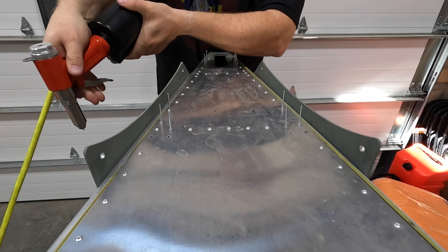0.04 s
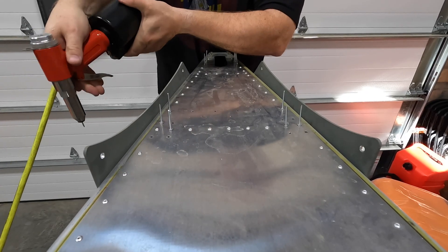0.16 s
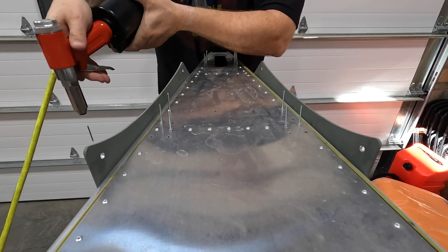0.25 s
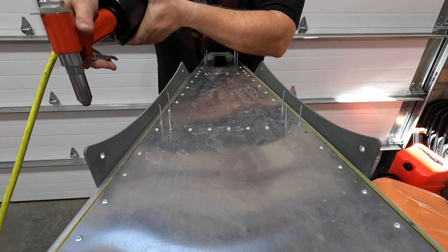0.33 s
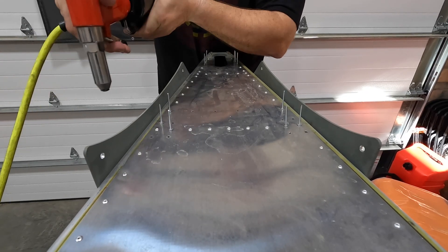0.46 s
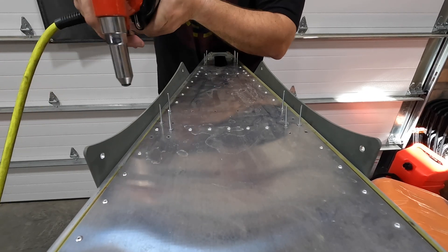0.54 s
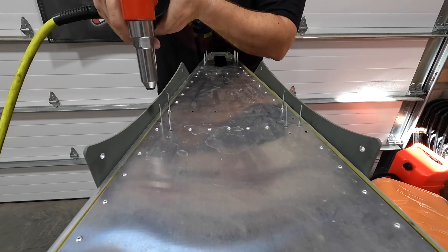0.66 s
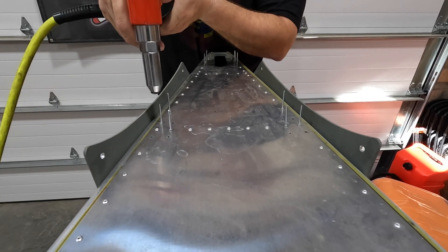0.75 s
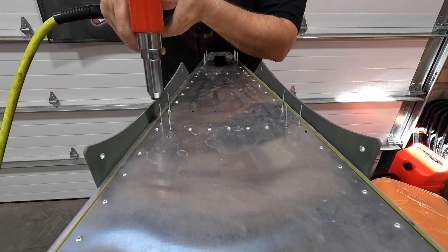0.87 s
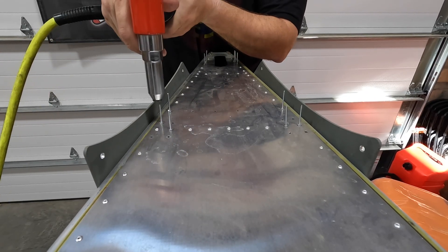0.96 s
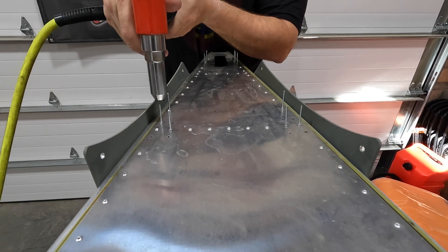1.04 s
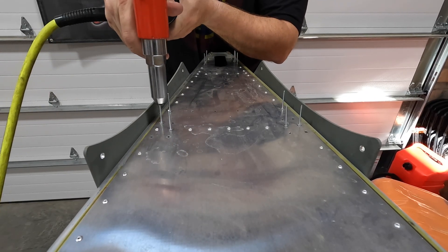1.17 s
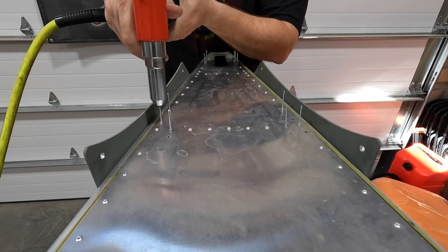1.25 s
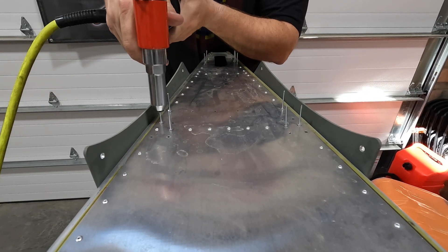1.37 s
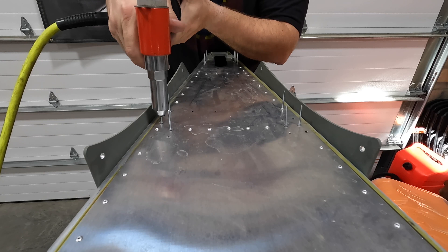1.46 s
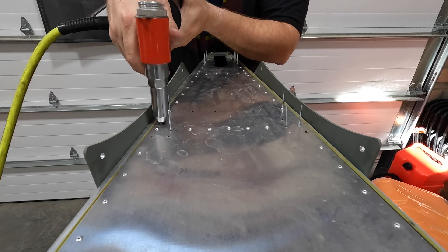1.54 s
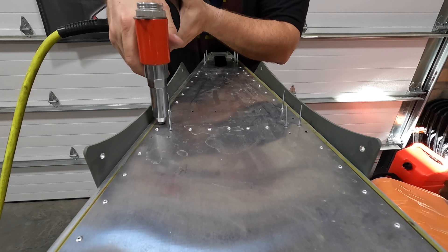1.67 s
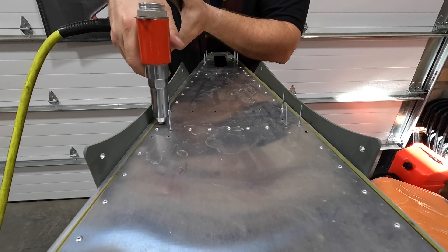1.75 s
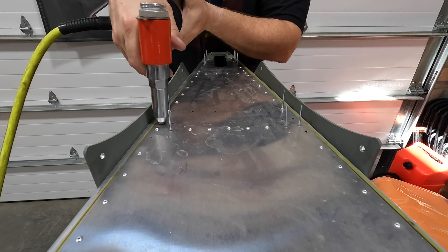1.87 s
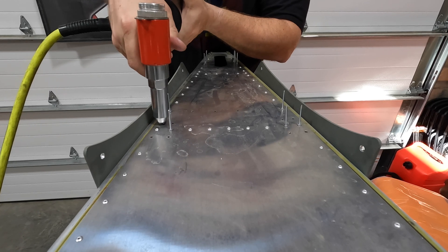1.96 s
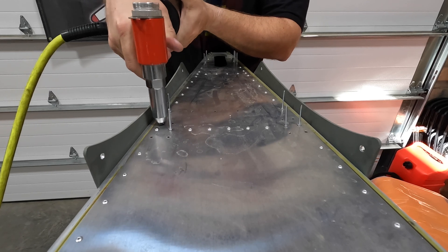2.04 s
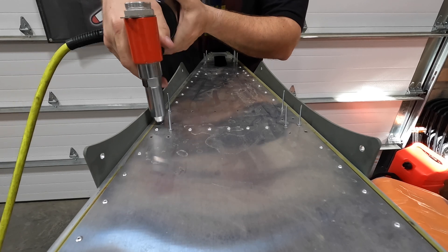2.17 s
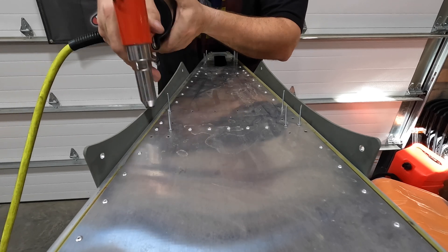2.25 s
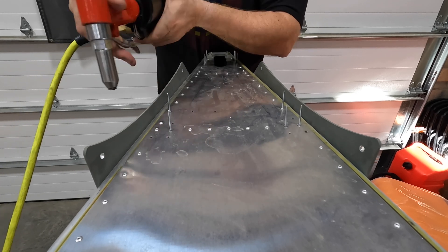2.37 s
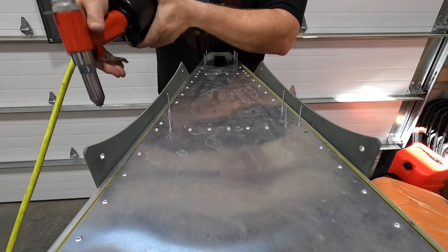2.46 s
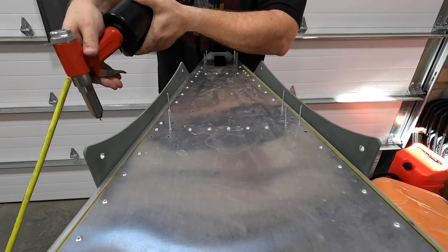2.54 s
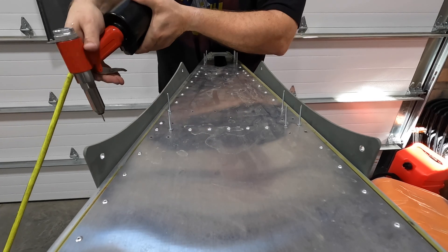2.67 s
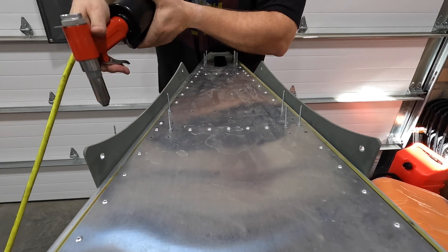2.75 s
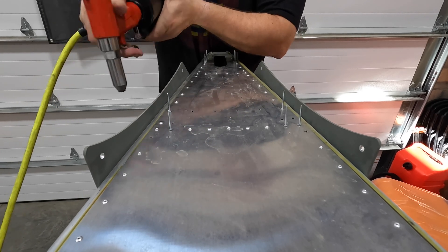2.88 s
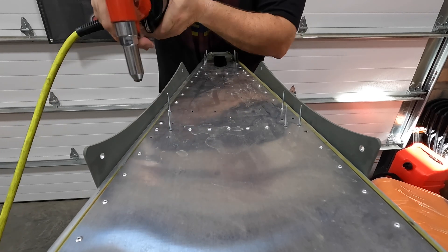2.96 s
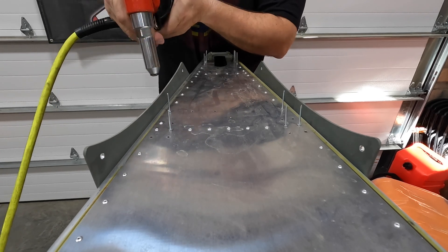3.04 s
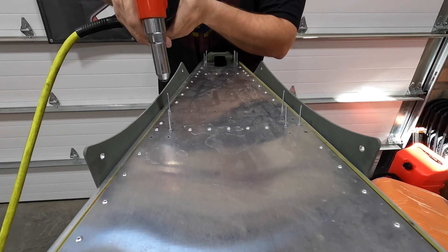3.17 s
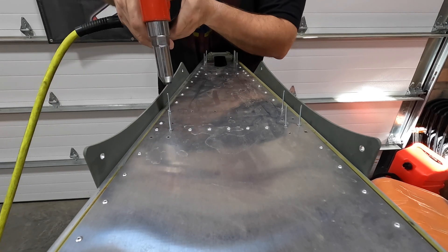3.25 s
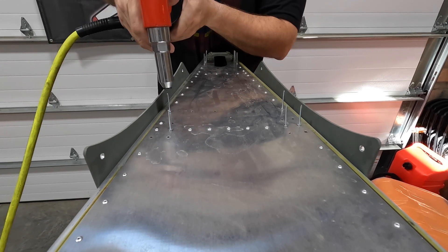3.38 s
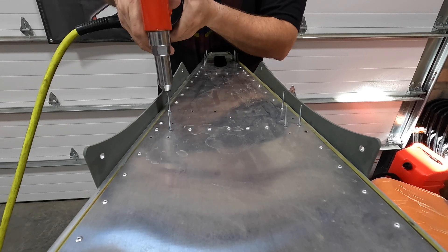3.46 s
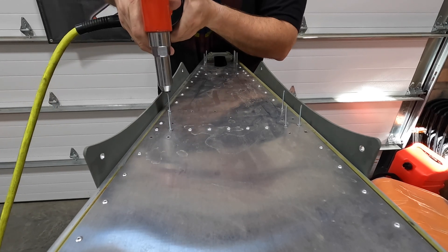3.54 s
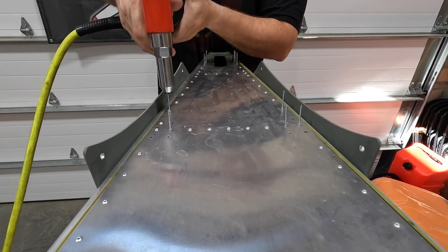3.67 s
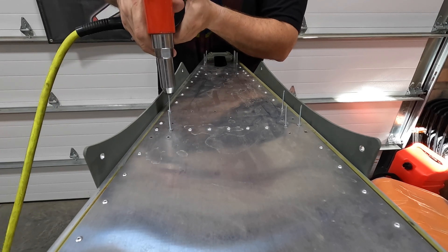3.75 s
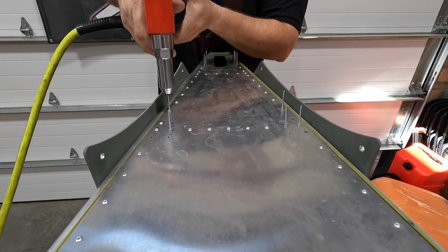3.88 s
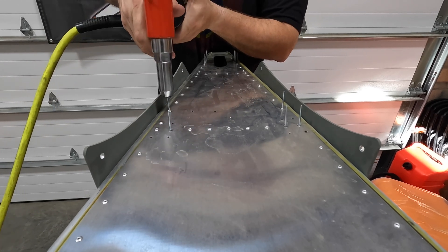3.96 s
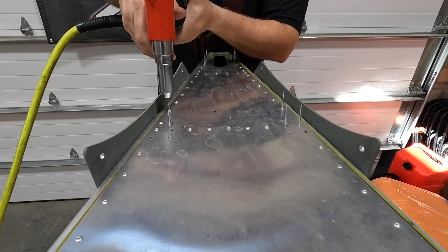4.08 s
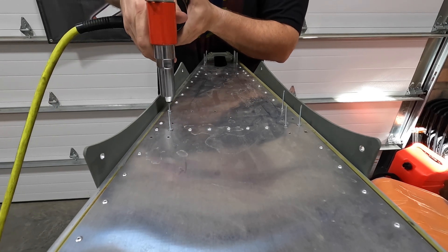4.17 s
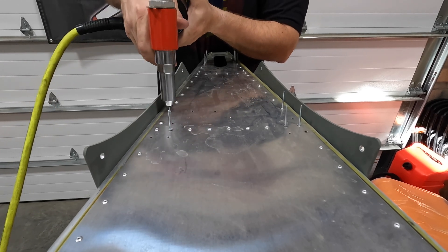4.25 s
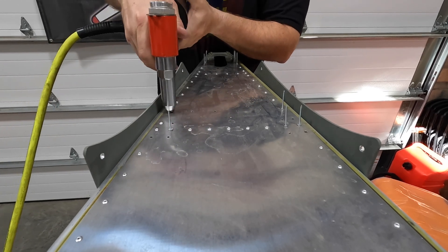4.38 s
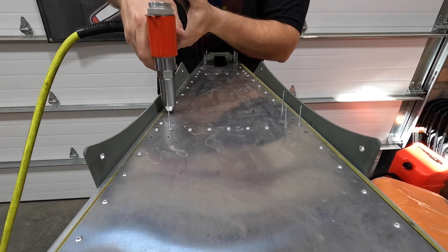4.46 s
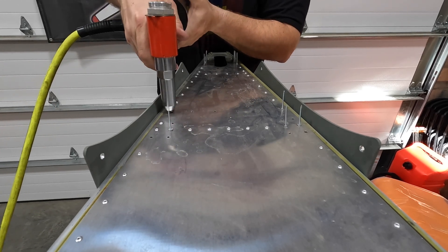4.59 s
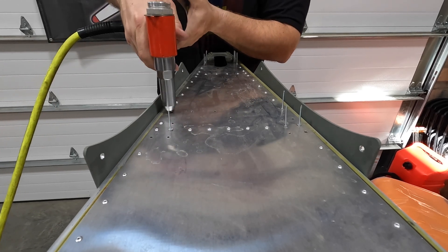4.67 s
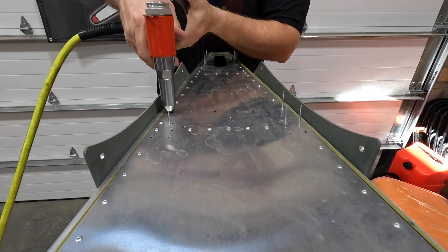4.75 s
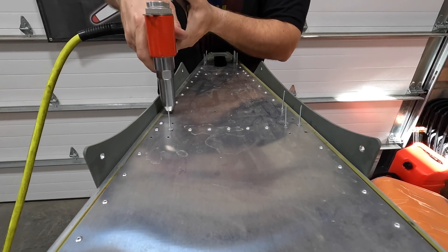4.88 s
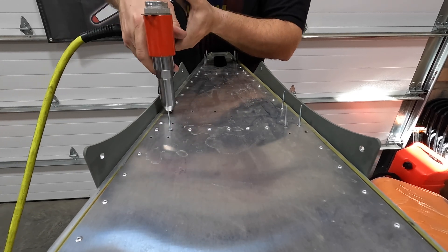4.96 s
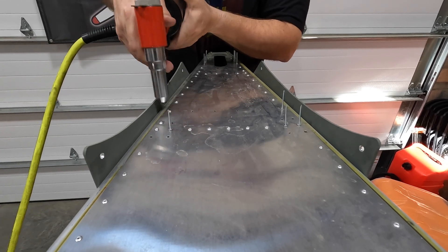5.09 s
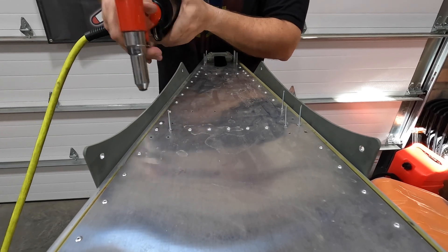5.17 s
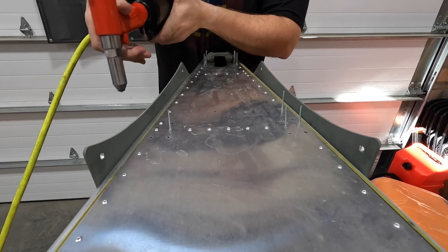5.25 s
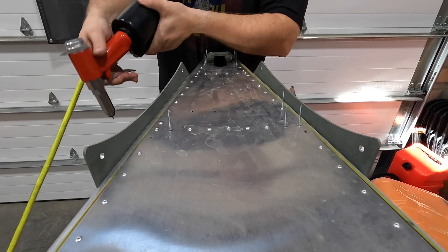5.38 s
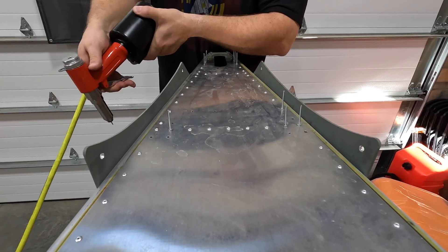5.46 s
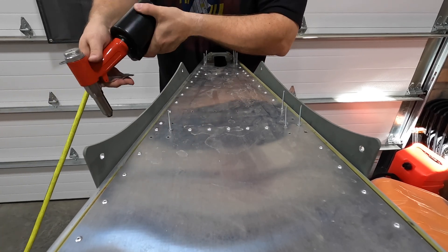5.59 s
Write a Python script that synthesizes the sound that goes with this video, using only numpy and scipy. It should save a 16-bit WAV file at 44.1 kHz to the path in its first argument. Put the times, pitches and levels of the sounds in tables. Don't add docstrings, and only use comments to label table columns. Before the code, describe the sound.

Over a constant throbbing compressor drone at the back of a workshop, a close air rivet gun clicks onto sheet metal, rushes with air, cracks sharply and hisses out. Light handling ticks follow, then a second tap, crack and hiss. The hollow panel thumps directly into the stereo microphones, and the drone dips after each blast.

```python
import sys
import numpy as np
from scipy import signal
from scipy.fft import rfft, irfft
from scipy.io import wavfile
from scipy.ndimage import uniform_filter1d, map_coordinates

SR = 44100
rng = np.random.default_rng(int(sys.argv[2]) if len(sys.argv) > 2 else 0)


def materialize(psi):
    bounded = np.clip(np.atleast_2d(psi).T, -1, 1)
    quanta = np.round(bounded * 32767).astype(np.int16)
    wavfile.write(sys.argv[1], SR, quanta)


def amplitude_ratio(level_db):
    exponent = np.asarray(level_db, float) / 20
    return 10 ** exponent


N = 247842
T = np.arange(N) / SR
HZ = np.fft.rfftfreq(N, 1 / SR)

CRANK_HZ = 28.256
# multiple of the crank rate, level/dB
CRANK_TONES = [(1, -49), (2, -33), (3, -58), (4, -36), (5, -43), (6, -42), (7, -52), (8, -42), (9, -46),
               (10, -42), (11, -44), (13, -42), (14, -34), (15, -44), (16, -45), (17, -49), (18, -45),
               (19, -51), (20, -51), (44, -48), (45, -50), (46, -44), (47, -47), (48, -43), (49, -41),
               (50, -46), (51, -51), (52, -49)]


def unit(x):
    return x / np.sqrt(np.mean(x ** 2))


def steady(x, span_s):
    return x / np.sqrt(uniform_filter1d(x ** 2, int(span_s * SR)) + 1e-12)


def shape(points):
    hz, db = np.transpose(points)
    return amplitude_ratio(np.interp(np.log(HZ + 1), np.log(hz), db))


def bumps(peaks):
    return amplitude_ratio(sum(db / (1 + (2 * (HZ - hz) / width) ** 2) for hz, width, db in peaks))


def above(hz):
    return 1 / np.sqrt(1 + (hz / (HZ + 1)) ** 8)


def below(hz):
    return 1 / np.sqrt(1 + (HZ / hz) ** 8)


def noise(gain):
    return irfft(rfft(rng.standard_normal(N)) * gain, N)


def walk(rate):
    k = int(SR / rate)
    return unit(uniform_filter1d(uniform_filter1d(rng.standard_normal(N), k), k))


def ring(x, hz, t60):
    p = np.exp(2j * np.pi * hz / SR - np.log(1000) / (t60 * SR))
    return signal.lfilter([0, p.imag], [1, -2 * p.real, abs(p) ** 2], x)


def body(x, modes):
    return sum((-1) ** k * amplitude_ratio(db) * ring(x, hz, t60) for k, (hz, db, t60) in enumerate(modes))


def hold_fall(since, hold_s, fall_db_per_s):
    return -fall_db_per_s * np.maximum(since - hold_s, 0)


def mix(levels_db):
    return np.sqrt(sum(amplitude_ratio(db) ** 2 for db in levels_db))


def tail(t60):
    t = np.arange(int(t60 * SR)) / SR
    h = rng.standard_normal(len(t)) * np.exp(-np.log(1000) * t / t60)
    return h / np.sqrt(np.sum(h ** 2))


def gain_control():
    # t/s, dip/dB, treble the shop gives back/dB, which lingers/s
    ducks = [
        (-.5, 10.5, 0, .2),
        (1.71, 2.2, 0, .2),
        (2.1, 8.5, 19, 0.27),
        (4.49, 3, -4, 0.22),
        (4.94, 10.5, 10.5, 0.49),
    ]
    attack_s, recover_s = 0.16, 1.233
    gain_db = 1.18
    treble_db = -0.4 + 1.5 * T
    for s, dip_db, bright_db, linger_s in ducks:
        since = np.maximum(T - s, 0)
        grab = 1 - np.exp(-since / attack_s)
        gain_db = gain_db - dip_db * grab * np.exp(-(since / recover_s) ** 2)
        treble_db = treble_db + bright_db * grab * np.exp(-(since / linger_s) ** 2)
    return gain_db, treble_db


def faint_tones():
    # f/Hz, width/Hz, lift/dB
    pipes = [(1120, 200, 11.5), (1390, 71, 8), (1760, 290, 9), (2580, 67, 10.5)]
    base_db, scatter_db, heard_db = -64, 3, -60.5
    ks = np.setdiff1d(np.arange(26, 95), np.transpose(CRANK_TONES)[0])
    lift_db = sum(db / (1 + (2 * (ks * CRANK_HZ - hz) / width) ** 2) for hz, width, db in pipes)
    levels_db = base_db + lift_db + scatter_db * rng.standard_normal(len(ks))
    return [(k, db) for k, db in zip(ks, levels_db) if db > heard_db]


def compressor():
    # f/Hz, level/dB per Hz
    wash_points = [(15, -17), (28, 0.5), (48, 10), (70, -38), (500, -18), (750, -11), (1150, -10),
                   (1400, -10.5), (1650, -12), (2550, -18.5), (2850, -22.5), (4300, -21.5), (7000, -38),
                   (12100, -50.5), (15500, -71)]
    # f/Hz, width/Hz, lift/dB
    housing = [(2620, 230, 3), (3500, 800, 0), (4700, 140, 6.5), (5540, 1540, -5), (6610, 1100, 8)]
    wash_db, puff_depth_db = -33, 0.5
    gain_db, treble_db = gain_control()
    turn = 2 * np.pi * CRANK_HZ * T
    sway = [walk(13.0) for _ in range(4)]
    tones = 0
    for k, db in CRANK_TONES + faint_tones():
        waver = 0.00075 * k * sway[int(k) % 4]
        spread_rad = 1.45 if k < 30 else 0.6
        phase = spread_rad * k * k + 0.5 * rng.standard_normal()
        tones = tones + np.sqrt(2) * amplitude_ratio(db + 1.6 * waver) * np.sin(k * turn + waver + phase)
    colour = shape(wash_points) * bumps(housing)
    low = noise(colour * below(1240.0))
    high = noise(colour * above(1150.0))
    puff_db = puff_depth_db * (np.cos(turn) + np.cos(2 * turn) + np.cos(5 * turn))
    high = high * amplitude_ratio(treble_db + puff_db + 0.41 * walk(14))
    wash = amplitude_ratio(wash_db) * unit(low + high)
    return amplitude_ratio(gain_db) * (tones + wash)


def panel():
    # f/Hz, level/dB, t60/s
    frame = [(65, 3, 0.11), (77.2, 1, 0.38), (96.6, -2, 0.24), (115.6, 9.5, 0.063)]
    belly = [(131.5, -2, 0.2), (137.8, -6.5, 0.23), (152.2, -5, 0.32), (169.9, -1.5, 0.32),
             (194.3, -7, 0.13), (220, -3.5, 0.21)]
    skin = [(237, 3, 0.11), (279.4, 3.5, 0.096), (309.6, 5, 0.13), (330, 3, 0.1), (429, -2, 0.1),
            (509, 0.5, 0.077), (599, -4.5, 0.11), (684, -9.5, 0.1), (795, -7.5, 0.078), (1070, -1, 0.023)]
    # t/s, lasts/s, frame/dB, belly/dB, skin/dB
    jolts = [(0, 0.13, -37.5, -34, -45), (.28, 0.041, -36, -36.5, -52), (1.721, 0.02, -20, -17.5, -31),
             (1.806, .005, -22, -36, -50), (1.87, .005, -34, -29, -47), (2.105, 0.016, -14.5, -15.5, -21.5),
             (2.19, 0.02, -33, -16, -19.5), (2.27, 0.07, -24.5, -22, -29), (2.428, .02, -28, -25.5, -51),
             (2.5, 0.11, -33.5, -32, -54), (2.78, 0.21, -36, -44, -64), (3.877, 0.017, -29.5, -39, -47),
             (4.314, 0.018, -41, -55, -36), (4.499, 0.0061, -21, -18.5, -36),
             (4.528, 0.0067, -28, -28, -28), (4.585, .03, -23.5, -26, -45), (4.937, .008, -19, -19, -28),
             (4.953, 0.025, -17.5, -12.5, -20), (5.02, 0.012, -22, -23, -27), (5.05, .005, -36, -18, -33),
             (5.11, 0.041, -26.5, -25, -33), (5.221, .01, -25.5, -39, -39), (5.363, 0.017, -29.5, -44, -55),
             (5.55, 0.023, -28, -36, -54)]
    fall_db_per_s = [147, 148, 243]
    hands_db = [-38.5, -47, -53.5]
    rise_db_per_s = 898
    after_db, after_db_per_s = -13.5, 33
    push = rng.standard_normal(N) * amplitude_ratio(4.3 * walk(48))
    step = T[::32]
    out = 0
    for k, modes in enumerate((frame, belly, skin)):
        levels_db = [hands_db[k]]
        for s, lasts, *db in jolts:
            since = step - s
            rise_db = db[k] + rise_db_per_s * np.minimum(since, 0)
            levels_db.append(rise_db + hold_fall(since, lasts, fall_db_per_s[k]))
            levels_db.append(rise_db + after_db + hold_fall(since, lasts, after_db_per_s))
        out = out + np.interp(T, step, mix(levels_db)) * steady(body(push, modes), 0.044)
    return out


def air():
    # f/Hz, level/dB per Hz
    jet_points = [(410, -28), (700, -1.5), (818, -3), (1240, 5.5), (1850, 2.5), (2430, 4.5), (3230, -2.5),
                  (6680, -20), (11200, -15.5), (14200, -20), (15500, -32)]
    # f/Hz, width/Hz, lift/dB
    ports = [(5010, 130, 6), (5800, 1460, 14), (6430, 1400, 6.5), (7740, 1500, 11), (8540, 600, 2.5),
             (10350, 1400, 7), (12000, 1100, 2.5)]
    # f/Hz, width/Hz, lift/dB
    whistle_peaks = [(10400, 1200, 11), (12000, 1800, 15)]
    # t/s, level/dB, low rush/dB, thin leak/dB, detour off the sheet/ms
    intakes = [
        (2.092, -3, 0.5, 0.5, 0.412),
        (4.932, -1.3, -1, -2.5, .455),
    ]
    exhausts = [
        (-.232, -13, 12.5, 5.5, .42),
        (2.254, 0.5, 1.5, -1, .425),
        (5.093, 0.9, -1.5, -0.3, 0.46),
    ]
    # holds/s, falls/dB per s, hiss/dB, rush/dB, leak/dB
    intake_stages = [
        (.007, 400, -37.5, -24, -76),
        (0.084, 450, -28.5, -26, -31),
    ]
    exhaust_stages = [
        (.01, 125, -50, -50, -39),
        (0.12, 124, -29.5, -33, -39),
        (0.38, 150, -47, -46, -52.5),
        (0.43, 10, -52, -43, -62.5),
    ]
    open_s, shut_s = 0.006, 0.0034
    whistle_db, whistle_from_s, whistle_rise_s = -50.5, 0.34, 0.091
    tipped_ms, tipping_s = 0.4, 0.35
    sheet_echo = 0.55

    colour = shape(jet_points) * bumps(ports) * below(12800.0)
    rush = unit(noise(colour * below(4000.0))) * amplitude_ratio(0.95 * walk(39))
    hiss = unit(noise(colour * above(4100.0) * below(8800.0))) * amplitude_ratio(1.1 * walk(35))
    leak = unit(noise(colour * above(8800.0))) * amplitude_ratio(1.1 * walk(30))
    whistle_colour = bumps(whistle_peaks) * above(8700.0) * below(13000.0)
    whistle = unit(noise(whistle_colour)) * amplitude_ratio(1.5 * walk(20))

    out = np.zeros(N)
    bursts = [(r, 0.101, intake_stages) for r in intakes]
    bursts += [(r, 0.572, exhaust_stages) for r in exhausts]
    for (opens, db, rush_db, leak_db, detour_ms), lasts, stages in bursts:
        on = (T >= opens) & (T < opens + lasts + shut_s)
        since = T[on] - opens
        valve = np.clip(np.minimum(since / open_s, (lasts - since) / shut_s + 1), 0, 1) ** 2
        falls_db = [hold_fall(since, *stage[:2]) for stage in stages]
        hiss_gain, rush_gain, leak_gain = (
            mix(stage[k] + fall_db for stage, fall_db in zip(stages, falls_db)) for k in (2, 3, 4))
        jet = hiss_gain * hiss[on] + amplitude_ratio(leak_db) * leak_gain * leak[on]
        late_ms = detour_ms + (tipped_ms - detour_ms) * np.clip(since / tipping_s, 0, 1)
        heard_at = np.maximum(np.arange(len(jet)) - late_ms * SR / 1000, 0)
        echo = map_coordinates(jet, [heard_at], order=3)
        thinning = np.clip((since - whistle_from_s) / whistle_rise_s, 0, 1)
        thin = amplitude_ratio(whistle_db + leak_db) * thinning * whistle[on]
        low = amplitude_ratio(rush_db) * rush_gain * rush[on]
        out[on] += valve * amplitude_ratio(db) * (jet + sheet_echo * echo + low + thin)
    return out


def taps():
    # t/s, crack/dB, body ring/dB, ping f/Hz, ping/dB
    contacts = [(.3406, -43.5, -48, 3870, -38), (0.505, -35, -48, 12000, -37),
                (1.334, -24, -34, 704, -31.5), (1.361, -27, -39, 2500, -36), (1.347, -44, -50, 11800, -39),
                (1.7035, -23, -32, 6640, -25), (1.7052, -31, -31, 3300, -24), (1.7097, -26, -36, 6500, -25),
                (1.7128, -24, -22, 5330, -23), (1.7205, -30, -25, 750, -18), (1.723, -45, -40, 10500, -47),
                (2.0966, -22, -20, 3600, -35), (2.183, -11, -12.5, 1243, -7.5),
                (2.828, -24, -33, 2320, -31), (4.4846, -17, -14, 2520, -25), (4.491, -21, -28, 1760, -18),
                (4.5015, -34, -25, 1020, -25), (4.508, -36, -38, 755, -20), (4.935, -24, -42, 6700, -21),
                (4.941, -24, -23, 3180, -19), (5.024, -8, -9.5, 5300, -10)]
    snaps = [
        (2.1832, -5, -19, 4880, -30),
        (5.0233, -6.5, -15, 2250, -29),
    ]
    # f/Hz, level/dB, t60/s
    ring_modes = [(958, -8.5, 0.092), (1065, -13.5, 0.22), (1350, 3.5, 0.018), (2160, -7, 0.066),
                  (2500, -8, 0.025)]
    tap_hz, snap_hz = 4530, 9050
    crack_s, grind_s, ping_cycles = 0.0005, 0.0073, 50
    out, blows = np.zeros(N), np.zeros(N)
    t = np.arange(int(0.1 * SR)) / SR
    hits = [(*r, tap_hz * (r[3] / tap_hz) ** 0.14) for r in contacts]
    hits += [(*r, snap_hz) for r in snaps]
    for s, crack_db, body_db, ping_hz, ping_db, crack_hz in hits:
        i = int(s * SR)
        grit = rng.standard_normal(len(t))
        band = signal.butter(2, [0.4 * crack_hz, 1.3 * crack_hz], "band", fs=SR, output="sos")
        crack = signal.sosfilt(band, grit * (np.exp(-t / crack_s) + 0.2 * np.exp(-t / grind_s)))
        ping = np.sin(2 * np.pi * ping_hz * t) * np.exp(-np.log(1000) * t * ping_hz / ping_cycles)
        out[i:i + len(t)] += amplitude_ratio(crack_db) * crack / abs(crack).max() + amplitude_ratio(ping_db) * ping
        blows[i] = amplitude_ratio(body_db)
    dull = signal.butter(4, 13500, fs=SR, output="sos")
    return signal.sosfilt(dull, out + body(blows, ring_modes))


def two_ports(mid, gun, boom):
    # f/Hz, level/dB
    side_points = [(60, -37.5), (200, -47), (380, -24.5), (700, -12), (1290, -15), (2000, -5), (3000, -5.5),
                   (4400, -6), (6000, -19.5), (8500, -24), (11000, -12), (15000, -1)]
    # f/Hz, level/dB
    balance_points = [(60, -0.5), (110, -0.5), (200, 0.0), (380, 0.5), (700, 1.0), (1290, 1.5), (2380, 0.0),
                      (4400, 0.5), (8120, 0.0), (15000, 0.0)]
    lag_share, gun_lean, contact_side_db = 0.35, -0.07, -26
    echoes = tail(0.12)
    unlike = signal.fftconvolve(mid, echoes)[:N]
    ports = -1j * np.sqrt(lag_share) * rfft(mid) + np.sqrt(1 - lag_share) * rfft(unlike)
    balance = shape(balance_points)
    lean = (balance - 1) / balance
    side = irfft(shape(side_points) * ports + lean * rfft(mid), N) + gun_lean * gun
    side = side + amplitude_ratio(contact_side_db) * signal.fftconvolve(boom, echoes)[:N]
    return np.array([mid + side, mid - side])


def scene():
    room_db, room_t60_s = -17, 0.76
    gun = air() + taps()
    boom = panel()
    room = amplitude_ratio(room_db) * signal.fftconvolve(gun, tail(room_t60_s))[:N]
    mid = gun + room + boom + compressor()
    return two_ports(mid, gun, boom)


def top_cut(x):
    return signal.sosfilt(signal.butter(12, 15680, fs=SR, output="sos"), x)


def record(dry):
    mic = signal.butter(4, 15900, fs=SR, output="sos")
    dull = signal.sosfilt(mic, dry)
    return top_cut(np.clip(dull, -1, 1))


dry = scene()
out = record(dry)
materialize(out)
```